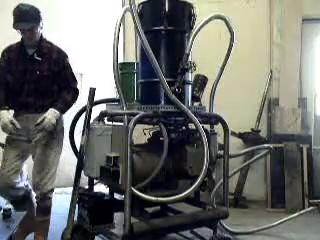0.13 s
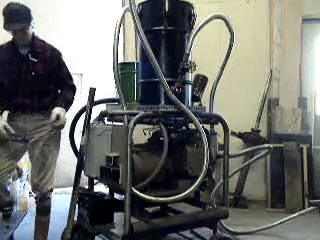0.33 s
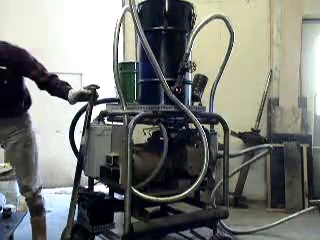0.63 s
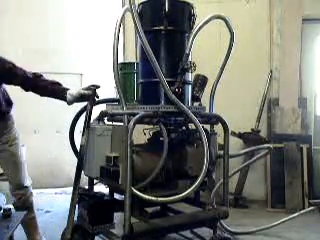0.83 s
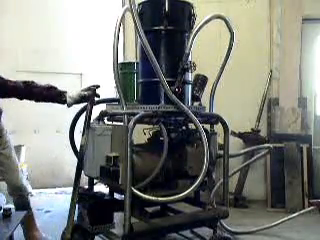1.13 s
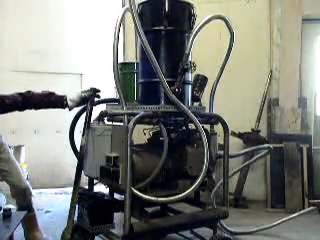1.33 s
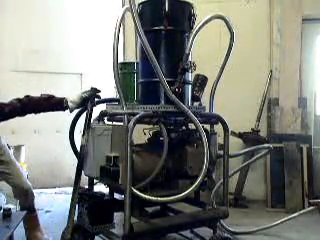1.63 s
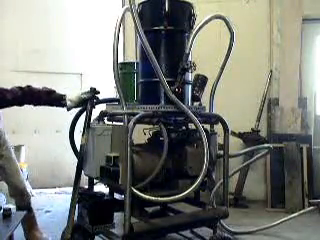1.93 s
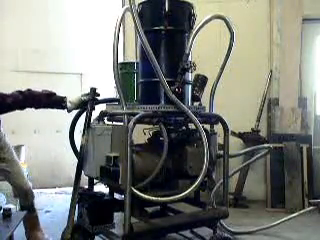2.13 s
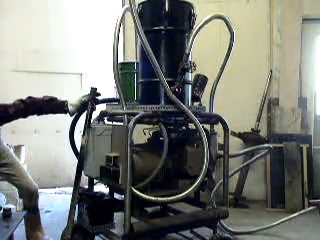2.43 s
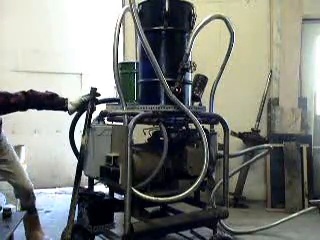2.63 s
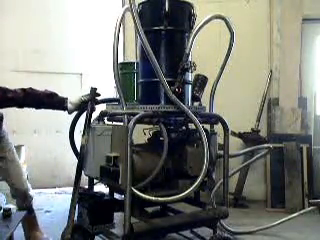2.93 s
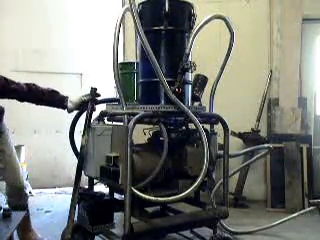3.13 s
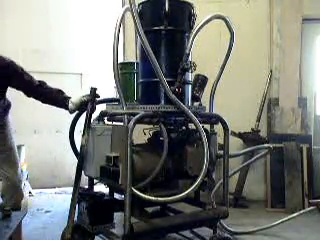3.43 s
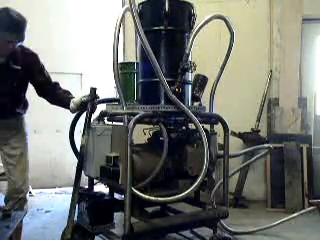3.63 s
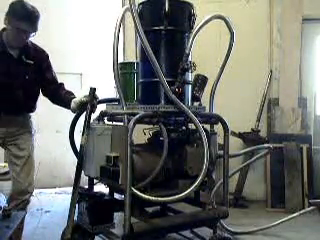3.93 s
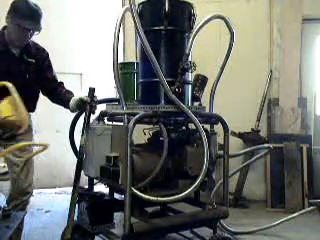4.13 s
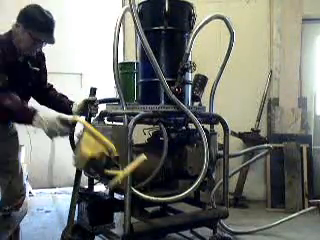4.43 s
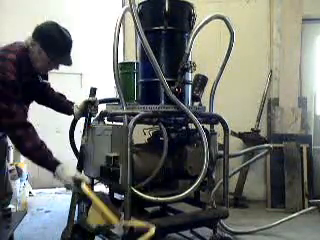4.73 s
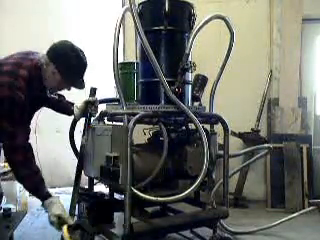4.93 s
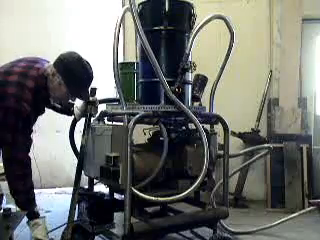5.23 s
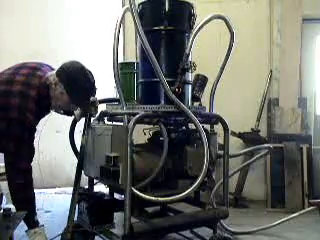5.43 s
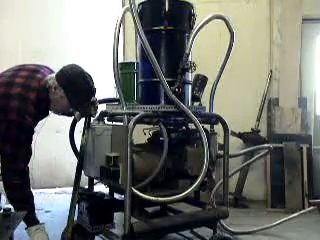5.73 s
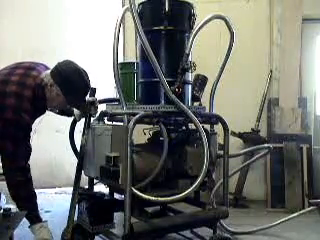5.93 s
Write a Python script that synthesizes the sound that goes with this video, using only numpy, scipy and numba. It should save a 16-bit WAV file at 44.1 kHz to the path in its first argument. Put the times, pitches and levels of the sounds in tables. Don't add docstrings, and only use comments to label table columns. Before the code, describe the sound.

A small engine-driven machine drones steadily in a bare workshop, rough air roar and thin whine, with microphone thumps and a few hard clacks.

```python
import sys
import numpy as np
from scipy import signal
from scipy.io import wavfile
from scipy.ndimage import uniform_filter1d, map_coordinates
from numba import njit

SR = 44100
rng = np.random.default_rng(int(sys.argv[2]) if len(sys.argv) > 2 else 0)


def linear_from_db(decibels):
    return 10 ** (np.asarray(decibels, float) / 20)


def int16_out(signal):
    q = np.round(np.clip(np.atleast_2d(signal).T, -1, 1) * 32767)
    wavfile.write(sys.argv[1], SR, q.astype(np.int16))


N = 267687


def level(x, rms_db):
    return x * linear_from_db(rms_db) / np.sqrt(np.mean(x ** 2))


def curves(table):
    s, *columns = np.transpose(table)
    t = np.arange(N) / SR
    return [np.interp(t, s, column) for column in columns]


def band(x, kind, hz, order=2):
    return signal.sosfilt(signal.butter(order, hz, kind, fs=SR, output="sos"), x)


def walk(rate_hz):
    hold = int(SR / rate_hz)
    steps = np.repeat(rng.standard_normal(N // 100)[:N // hold + 1], hold)
    return 1.24 * uniform_filter1d(uniform_filter1d(steps, hold), hold)[:N]


@njit
def svf(x, hz, width_hz):
    y, b, l = np.empty(len(x)), 0., 0.
    g, k = np.tan(np.pi * hz / SR), width_hz / hz
    for i in range(len(x)):
        v = (b + g * (x[i] - l)) / (1 + g * (g + k))
        b, l, y[i] = 2 * v - b, l + 2 * g * v, k * v
    return y


@njit
def walls(x, lags, gain, damp):
    line, soft, out = np.zeros((8, 8192)), np.zeros(8), np.zeros(len(x))
    for i in range(len(x)):
        total = 0.
        for k in range(8):
            soft[k] += (1 - damp) * (gain[k] * line[k, (i - lags[k]) & 8191] - soft[k])
            total += soft[k]
            out[i] += soft[k] * (1 - 2 * (k % 2))
        for k in range(8):
            line[k, i & 8191] = x[i] + soft[k] - total / 4
    return out


# (time [s], peak [dB], fade [s])
GUSTS = [(.27, -24, 0.044), (.51, -25, 0.057), (.92, -27, 0.14), (1.05, -36, 0.027), (1.18, -18, .03),
         (1.4, -9, 0.03), (1.6, -21, 0.046), (1.71, -25, 0.016), (1.78, -12, 0.02), (2.03, -18, 0.025),
         (2.649, -17, 0.033), (2.9, -24.5, 0.087), (3.28, -20, 0.044), (3.41, -28, 0.033), (3.6, -27, .03),
         (3.7, -25, .03), (3.87, -28, 0.023), (4.3, -17.5, 0.057), (4.45, -23, 0.085), (4.77, -34, .08),
         (5.45, -23, 0.038), (5.71, -40, .06), (5.9, -25, .08)]
# (time [s], peak [dB], width [ms], push 1 or pull -1)
PUFFS = [(0.119, -4, 2.2, -1), (0.262, -7, 2.6, 1), (0.308, -23, 2.7, 1), (0.505, -13, 3.6, 1),
         (0.533, -19, 6.9, 1), (0.933, -13, 1.8, 1), (1.354, -18, 5.6, 1), (1.384, -21, 4.4, 1),
         (1.402, -17, 5.2, 1), (1.427, -3.5, 2.9, 1), (1.6, -15, 2.7, -1), (1.7, -12, 3.7, -1),
         (1.722, -9, 2.6, -1), (1.784, -5.5, 2.1, 1), (2.643, -21, 6.4, 1), (3.301, -14, 13, 1),
         (3.349, -21, 8, 1), (3.701, -22, 4.6, 1), (3.865, -21, 8.2, 1), (3.882, -23, 5, -1),
         (4.267, -18, 4.9, 1), (4.307, -16, 8.8, 1), (4.319, -17, 0.9, -1), (4.341, -23, 11, 1),
         (4.477, -18, 8.1, -1)]


def draught():
    t = np.arange(N) / SR
    still_air_db = -41
    gain = linear_from_db(still_air_db) + sum(linear_from_db(db) * np.exp(-np.abs(t - s) / fade_s) for s, db, fade_s in GUSTS)
    rumble = band(band(rng.standard_normal(N), "low", 52.6), "high", 12)
    out = gain * level(rumble * linear_from_db(0.98 * walk(29.85)), -1.6)
    for s, peak_db, width_ms, side in PUFFS:
        u = np.abs(t - s) / (width_ms * 0.0006)
        out = out + np.sign(side) * linear_from_db(peak_db + 4.0) * (1 - 0.64 * u) * np.exp(-u)
    return out


# (time [s], peak [dB], ring [Hz], t60 [s])
CLACKS = [(0.306, -2, 201, 0.0071), (.83, -16, 106, 0.18), (5.428, -17, 111, .15), (5.86, -17.5, 135, 0.16),
          (4.423, -10, 3309, 0.015), (4.485, -9.5, 3500, 0.02), (4.546, 1.5, 1010, 0.012),
          (4.548, -11, 1540, 0.013), (4.549, -9, 3192, 0.012), (4.704, -20, 700.6, 0.041),
          (4.74, -16, 2600, .02), (4.93, -15, 2550, 0.022)]


def clacks():
    out, t = np.zeros(N), np.arange(8000) / SR
    for s, peak_db, ring_hz, t60_s in CLACKS:
        i = int(s * SR)
        decay = np.exp(-np.log(1000) * t / t60_s)
        out[i:i + len(t)] += linear_from_db(peak_db) * np.sin(2 * np.pi * ring_hz * t) * decay
    return out


BLOW_LEVELS_DB = [6.5, -9, 2, -3.5, 5, -5, 4, -6.5]
# (centre [Hz], width [Hz], level [dB])
FRAME_MODES = [(63.3, 45, -8), (243, 82, -7.5), (322, 55, 0), (571, 49, -2.5), (866, 120, -3),
               (1310, 580, -12), (1650, 150, -10.5), (2600, 4500, -29)]


def blows(phase, jitter_s=0.00021, scatter_db=3.0):
    at = np.flatnonzero(np.diff(np.floor(phase)))
    late, louder = rng.standard_normal((N // 100, 2))[:len(at)].T
    when = np.clip(at + (jitter_s * SR * late).astype(int), 0, N - 1)
    pulses = np.zeros(N)
    pulses[when] = linear_from_db(np.resize(BLOW_LEVELS_DB, len(at)) + scatter_db * louder)
    out = 0
    for k, (hz, width_hz, db) in enumerate(FRAME_MODES):
        ring = svf(pulses, 1. * hz, 1. * width_hz) / np.sqrt(width_hz)
        out = out + (-1) ** k * linear_from_db(db) * ring
    return out


def swells(table, rest_db, edge_s=0.027):
    t = np.arange(N) / SR

    def on(s):
        return .5 + .5 * np.tanh((t - s) / edge_s)

    gain = linear_from_db(rest_db)
    for s, length_s, db in table:
        gain = gain + (linear_from_db(db) - linear_from_db(rest_db)) * on(s) * (1 - on(s + length_s))
    return gain


# (time [s], length [s], level [dB])
THIRD_SWELLS = [
    (.2, 0.093, -22),
    (0.557, .9, -24),
    (2.902, 1, -27),
    (3.85, 0.45, -26),
    (4.6, .75, -23.5),
    (5.37, .7, -23),
]
# (time [s], length [s], level [dB])
LOWER_PAIR_SWELLS = [
    (0.0, 1.04, -35),
    (1.2, 0.36, -26.5),
    (1.7, 1.62, -28),
    (3.7, 0.65, -27.5),
]
# (time [s], length [s], level [dB])
UPPER_PAIR_SWELLS = [
    (.2, 1.7, -27),
    (1.95, 1.3, -25.5),
    (3.75, .5, -36),
    (4.75, 0.55, -30),
]
# (time [s], length [s], level [dB])
FIFTH_SWELLS = [
    (0.0, 0.46, -24.5),
    (0.585, 0.3, -21.5),
    (1.494, 0.4, -22),
    (2.153, 0.61, -22.5),
    (2.91, 0.34, -25.5),
    (3.505, .95, -22),
    (4.7, .35, -28.5),
    (5.05, 0.12, -24),
    (5.65, 0.22, -25.5),
]
# (time [s], length [s], level [dB])
SIXTH_SWELLS = [
    (0.0, 0.26, -30),
    (1.02, 0.41, -26),
    (1.95, .14, -25),
    (2.93, 0.35, -28),
    (3.253, 0.23, -22),
    (3.75, 0.99, -29),
    (4.65, 0.21, -26),
    (5.25, 0.13, -25),
    (5.6, .25, -29),
]
# (time [s], length [s], level [dB])
SEVENTH_SWELLS = [
    (0.0, .55, -31),
    (1.5, 0.28, -29),
    (2.2, 0.87, -27.5),
    (3.5, .5, -31),
    (4.8, .5, -31),
    (5.701, 0.43, -26.5),
]
# (time [s], length [s], level [dB])
EIGHTH_SWELLS = [
    (.2, .12, -29),
    (0.395, 0.48, -27.5),
    (1.5, 0.27, -28),
    (2.249, 0.4, -27),
    (3.756, 0.91, -28.5),
    (4.85, 0.31, -30),
    (5.201, .25, -33),
]
# (time [s], length [s], level [dB])
WHINE_SWELLS = [(0.384, 0.043, -24), (0.506, 0.3, -19.5), (0.907, 0.1, -16), (1.086, 0.089, -18),
                (1.387, 0.13, -18), (1.597, 0.028, -21), (1.807, 0.466, -21), (2.7, 0.16, -21),
                (3.286, 0.25, -19), (3.585, 0.37, -26), (4.33, 0.24, -21), (4.686, .11, -22.5),
                (5.155, 0.2, -21.5), (5.439, 0.51, -23)]
# (time [s], length [s], level [dB])
OCTAVE_SWELLS = [(0.781, 0.12, -33), (1.064, 0.18, -31.5), (1.36, 0.055, -30), (1.602, 0.12, -34),
                 (1.78, 0.12, -31), (1.99, 0.16, -31), (2.173, 0.16, -32), (2.363, 0.38, -35),
                 (2.78, .55, -33.5), (3.391, 0.076, -30), (3.543, .07, -31), (4.124, 0.22, -36.5),
                 (4.838, .22, -32.5), (5.14, .07, -32), (5.25, 0.096, -36), (5.5, 0.18, -33.5),
                 (5.96, .11, -32.5)]
TONE_ORDERS = (3, 4.5, 4.75, 5, 6, 7, 8, 15, 30)
TONE_REST_DB = [-27, -45, -41.5, -30.5, -38, -39, -37.5, -29.5, -43.5]
FAINT_ORDERS = (4, 10, 11.5, 13, 17, 22, 25, 27, 30, 31, 36, 38, 40, 44, 48, 52, 53, 56, 59, 61)
FAINT_DB = [-37.5, -32, -31, -39.5, -33, -36, -32, -35.5, -33, -34, -41, -39.5, -32.5, -33.5, -31.5, -31,
            -36, -34, -31, -49]


def tones(phase, wobble_rad=0.11, flicker_db=1, whine_throb=0.15):
    tables = (THIRD_SWELLS, LOWER_PAIR_SWELLS, UPPER_PAIR_SWELLS, FIFTH_SWELLS, SIXTH_SWELLS,
              SEVENTH_SWELLS, EIGHTH_SWELLS, WHINE_SWELLS, OCTAVE_SWELLS)
    out = 0
    for k, table, rest_db in zip(TONE_ORDERS, tables, TONE_REST_DB):
        gain = swells(table, rest_db) * linear_from_db(1.5 + flicker_db * walk(14))
        if k >= 15:
            gain = gain * (1 + whine_throb * np.cos(2 * np.pi * phase / 4 + 1.8 * walk(14)))
        drift_rad = (wobble_rad + 0.022 * k) * walk(25)
        out = out + gain * np.sqrt(2) * np.sin(2 * np.pi * k * phase + drift_rad)
    for k, db in zip(FAINT_ORDERS, FAINT_DB):
        gain = linear_from_db(db + 2.73 * walk(5))
        out = out + gain * np.sin(2 * np.pi * k * phase / 4 + 0.027 * k * walk(20))
    return out


# (frequency [Hz], density [dB per Hz])
ROAR_SPECTRUM = [(24, -42), (40, -24.5), (145, -13), (322, -3.5), (370, -8.5), (451, -3.5), (619, -0.5),
                 (684, -4), (755, -3), (1120, -8), (1740, -10), (1880, -8), (2040, -14), (3770, -17),
                 (4600, -19), (5980, -56), (10100, -120)]
# (time [s], level [dB], tilt [dB per octave])
LOAD = [(0.0, 0, 0.5), (0.28, 0.5, -0.5), (0.55, 0.5, -1), (1.0, -1, 0), (1.12, 2, .5), (1.9, 0.5, 0.5),
        (2.5, 1, 0.5), (3.1, -1, 1.1), (3.9, 0.5, 0), (4.25, 0.5, -0.5), (4.38, -2.5, 0.5), (4.5, 0, 0.5),
        (4.62, -1.5, 0.5), (4.72, 2, 0.6), (5.15, 2, -0.2), (5.5, 2.5, 1), (5.85, 2, 0), (6.07, 1, .5)]


def roar(phase, throb=0.12, flicker_db=1.13, clatter_db=0.75, tilt_pivot_hz=1010):
    hz, db = np.transpose(ROAR_SPECTRUM)
    out, clatter, tilt = 0, walk(25.04), curves(LOAD)[1]
    for centre_hz in 45 * 2 ** np.arange(0, 6.8, 1 / 3):
        gain_db = np.interp(np.log(centre_hz), np.log(hz), db) + flicker_db * walk(9)
        octaves = np.clip(np.log2(centre_hz / tilt_pivot_hz), -1, 2)
        gain_db = gain_db + tilt * octaves + clatter_db * clatter * max(octaves, 0)
        noise = svf(rng.standard_normal(N), centre_hz, centre_hz / 3)
        out = out + linear_from_db(gain_db) * svf(noise, centre_hz, centre_hz / 3)
    turn = np.cos(2 * np.pi * phase / 4)
    half_turn = 0.42 * np.cos(2 * np.pi * phase / 2)
    two_turns = 0.93 * np.cos(2 * np.pi * phase / 8)
    blow = 0.92 * np.cos(2 * np.pi * phase)
    return out * np.exp(throb * (turn + half_turn + two_turns + blow) / 2)


# (time [s], blow rate [Hz])
SPEED = [(0.0, 125.8), (0.4, 126.2), (.8, 126.2), (1.2, 125.6), (1.6, 125.4), (2.8, 125.7), (3.2, 126.2),
         (3.6, 126.5), (4.4, 125.9), (4.8, 126.4), (5.2, 126.9), (5.6, 126.8), (6.07, 126.3)]


def scene():
    phase = np.cumsum(curves(SPEED)[0]) / SR
    load = linear_from_db(curves(LOAD)[0])
    hits = clacks() - load * level(blows(phase), -25)
    air = load * level(roar(phase), -16)
    lags = rng.integers(700, 2600, 8)
    t60_s, damp, room_db = 0.79, 0.18, -13.5
    room = walls(hits, lags, linear_from_db(-60 * lags / SR / t60_s), damp)
    return (hits + air + linear_from_db(room_db) * room + tones(phase) + draught())[None]


# (time [s], depth [dB])
DUCKS = [
    (.311, -5.5),
    (3.49, -2),
    (4.552, -3.5),
]


def ducking(fall_s=.003, recover_s=0.033):
    t = np.arange(N) / SR
    gain_db = 0
    for s, depth_db in DUCKS:
        fall = np.clip((t - s) / fall_s, 0, 1)
        gain_db = gain_db + depth_db * fall * np.exp(-np.abs(t - s) / recover_s)
    return linear_from_db(gain_db)


@njit
def ride(x, top, attack, release):
    y, e = np.empty(len(x)), top
    for i in range(len(x)):
        a = abs(x[i])
        e += (a - e) * attack if a > e else (top - e) * release
        y[i] = x[i] * top / e
    return y


# (frequency [Hz], level [dB])
STARVED = [(4700, -70), (5300, -70.4), (5400, -76.5), (11800, -76.5), (12400, -75)]


def starve(x, size=2048, count=4):
    f, _, z = signal.stft(x, SR, nperseg=size)
    half = size // 2
    power = (np.abs(z[:half].reshape(-1, count, z.shape[1])) ** 2).mean(axis=1)
    strength = np.repeat(np.sqrt(uniform_filter1d(power, size=3, axis=1)), count, axis=0)
    hz, db = np.transpose(STARVED)
    threshold = linear_from_db(np.interp(f[:-1], hz, db, left=-200))
    z[:half] *= strength > threshold[:, None]
    return signal.istft(z, SR, nperseg=size)[1][:N]


def top_cut(x):
    return signal.sosfilt(signal.butter(12, 12640, fs=SR, output="sos"), x)


def record(dry):
    x = np.tanh(ride(dry[0] * ducking(), .78, .08, .0003) / 1.2) * 1.2
    x = signal.sosfilt(signal.ellip(10, .3, 60, 4490, fs=SR, output="sos"), x)
    edge = signal.sosfiltfilt(signal.butter(4, 4150, "high", fs=SR, output="sos"), x)
    x = x - edge * np.clip(2 * walk(170) - 1.1, 0, 1)
    camera_hz = 12100
    held_at = np.floor(np.arange(N) * camera_hz / SR) * SR / camera_hz
    held = map_coordinates(x, [held_at], order=3)
    mirror = signal.sosfilt(signal.ellip(8, .3, 60, 4850, "high", fs=SR, output="sos"), held)
    mirror = linear_from_db(-8.0) * mirror - linear_from_db(-18.5) * band(mirror, "high", 6300)
    bent = x - 0.063 * np.clip(x, -1, 1) ** 5
    return top_cut(starve(bent + mirror)[None])


dry = scene()
out = record(dry)
int16_out(out)
```